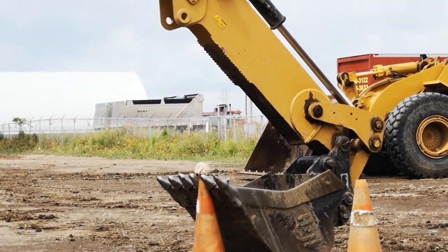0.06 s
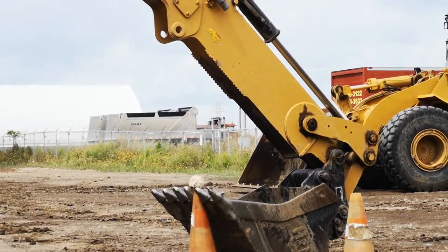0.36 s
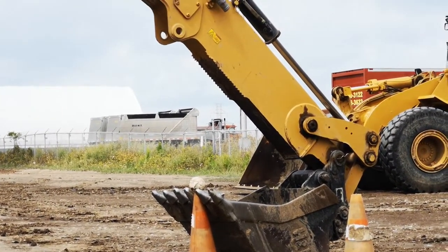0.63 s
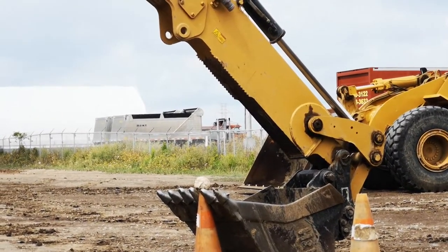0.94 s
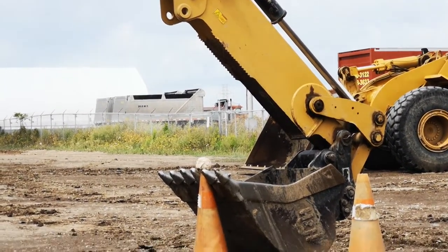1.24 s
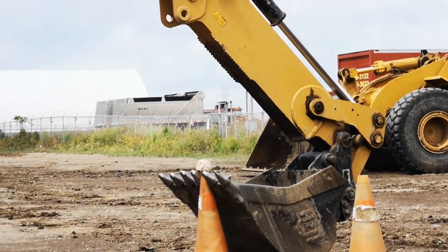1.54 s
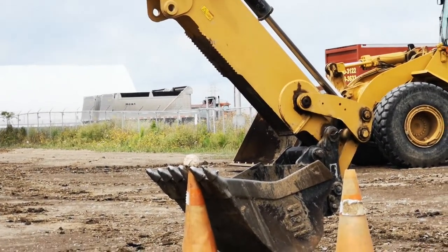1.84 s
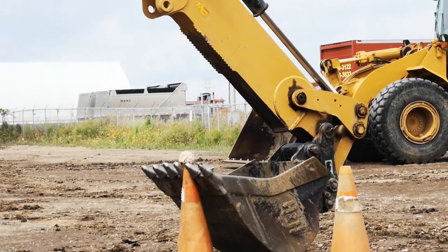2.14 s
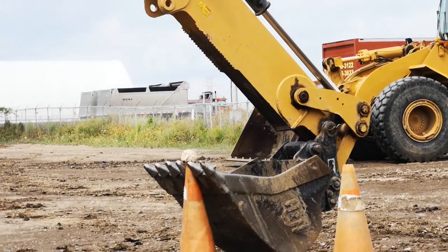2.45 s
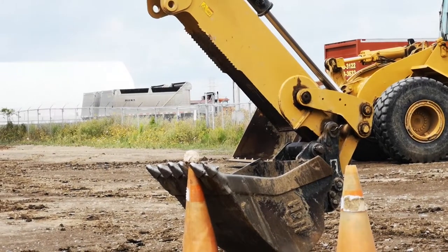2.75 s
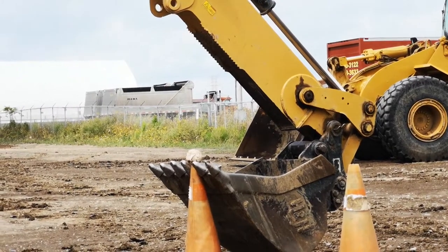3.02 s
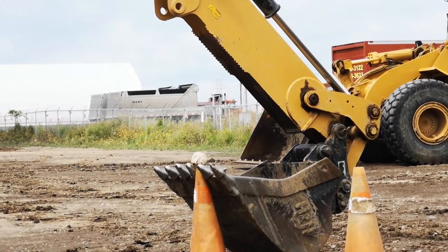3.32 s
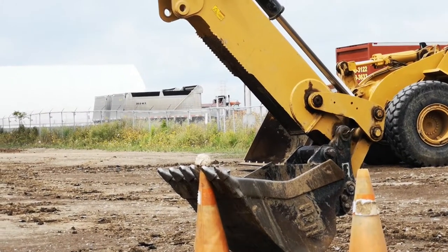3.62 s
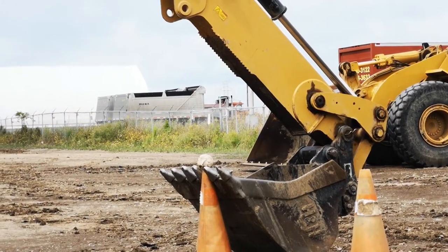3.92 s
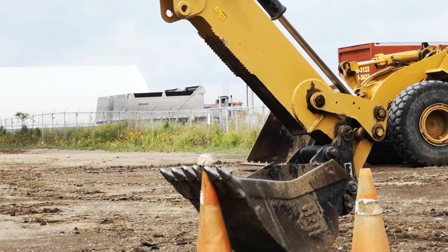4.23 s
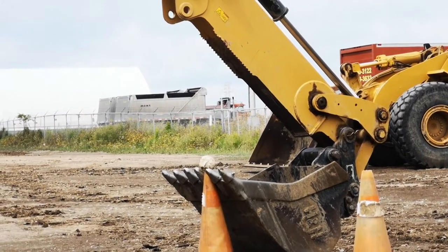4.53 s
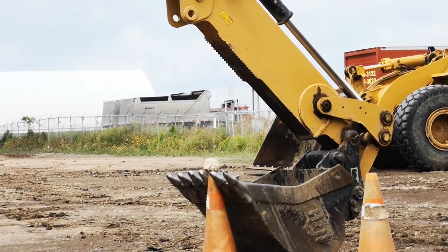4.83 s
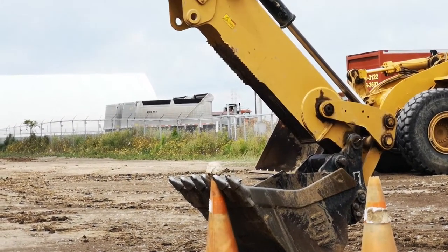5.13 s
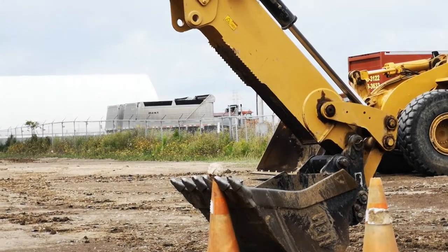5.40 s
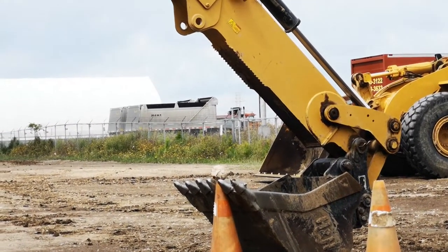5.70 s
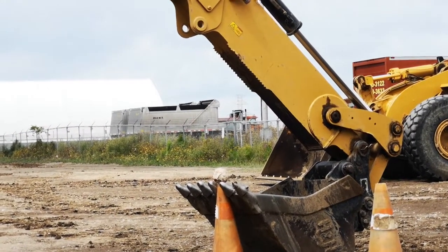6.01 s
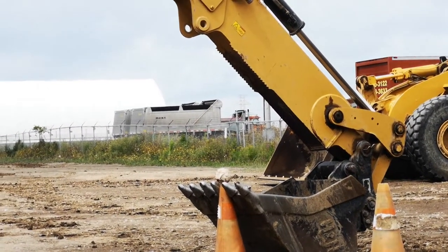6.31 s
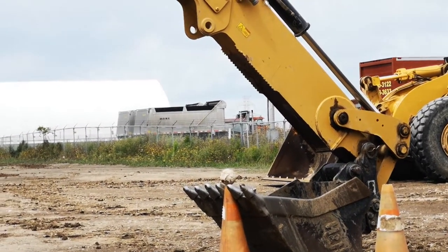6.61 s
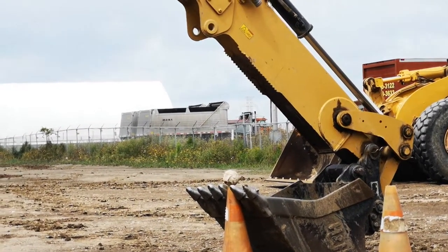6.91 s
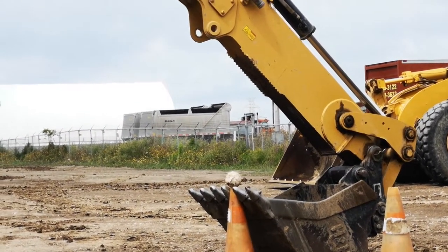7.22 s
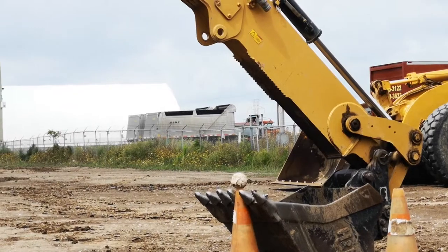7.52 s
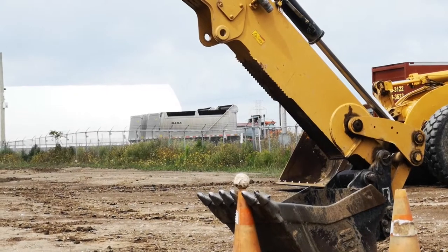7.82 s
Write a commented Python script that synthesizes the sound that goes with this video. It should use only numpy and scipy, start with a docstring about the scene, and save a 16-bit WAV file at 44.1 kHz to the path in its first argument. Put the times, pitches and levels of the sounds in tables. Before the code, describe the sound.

A diesel backhoe idles on an open worksite, its engine clattering and faintly whining a little to the left. Gusts of wind rumble and thump on the microphone throughout, and the hardest ones briefly push the volume down. In the second half the hydraulics are eased on and off: oil hisses through a valve in short spurts, joined by thin whistles and high sliding squeals that are busiest near the end.

```python
"""A diesel backhoe idles on an open worksite, its four-cylinder engine clattering and whining a little
to the left. In the second half the operator eases the hydraulics on and off: oil hisses through a valve
in short spurts, and the valve whistles and squeals when it is barely open. Gusts of wind rumble and
thump on a camera's microphone, and the camera turns everything down under the hardest ones."""
import sys
import numpy as np
from scipy import signal
from scipy.fft import rfft, irfft
from scipy.io import wavfile
from scipy.ndimage import uniform_filter1d

SR = 44100
rng = np.random.default_rng(int(sys.argv[2]) if len(sys.argv) > 2 else 0)


def transcribe(signal):
    """Save signal, clipped to [-1, 1], as a 16-bit WAV file at the path in sys.argv[1]."""
    frames = np.atleast_2d(signal).T
    limited = np.clip(frames, -1, 1)
    pcm = np.round(limited * 32767).astype(np.int16)
    wavfile.write(sys.argv[1], SR, pcm)


N = 355137
TIME = np.arange(N) / SR
FREQ = np.maximum(np.fft.rfftfreq(N, 1 / SR), 1)
CYCLE_HZ = 13.143  # engine cycles a second; all four cylinders fire once in each


def engine(clatter_db=-0.42, waver_db=1.5, speed_wander=0.0016):
    """The idling engine clatters through its housing; its exhaust and gear tones waver in the wind."""
    # The engine's tone colour at the microphone: pitch_hz, left_db, right_db, left_lead_rad, likeness
    colour = [(253.7, -55, -53.5, 0.11, 0.88), (608, -76, -75.5, 2.7, 0.93), (883, -64.5, -77.5, 1.81, 0.7),
              (1247, -76, -75, 2.33, 0.54), (1616, -69.5, -77.5, 3.6, 0.23),
              (2085, -66.5, -79.5, 2.26, 0.73), (2420, -73, -74, 3.83, 0.8), (3100, -81, -83, 5.6, 0.6),
              (4010, -88.5, -87.5, 5.63, 0.8), (5460, -85, -91, 3.6, 0.05), (6580, -90, -94, 7.6, 0.1),
              (7950, -81.5, -90.5, 8.3, 0.4), (10340, -102.0, -101.0, 7, 0.4), (12100, -107, -107, 25, 0)]
    # Ringing panels of the housing: pitch_hz, width_hz, level_db
    panels = [(1182, 32, 3), (1520, 65, -7.5), (1804, 28, 1), (1975, 44, 2), (2102, 30, -4.5),
              (2660, 71, 0), (2875, 74, -10), (3140, 73, -6), (3480, 22, 4.5), (4150, 81, -4),
              (5250, 40, 2)]
    # Exhaust and gear tones: vibrations_per_cycle
    multiples = np.array([4, 8, 12, 16, 55, 59, 60, 71, 75])
    # Strength of each of those tones: level_db
    tone_levels = [-32, -61, -52.5, -40, -56.5, -53.5, -47.5, -49, -50.5]
    cycles = np.cumsum(CYCLE_HZ * (1 + speed_wander * wobble(3))) / SR
    rattle = resonate(stereo(clatter(cycles), clatter(cycles), colour), panels)
    left_db, right_db, lead, _ = over_freq(colour)
    tones = np.zeros((2, N))
    for multiple, level_db in zip(multiples, tone_levels):
        at = np.searchsorted(FREQ, multiple * CYCLE_HZ)
        phase = 2 * np.pi * (multiple * cycles + rng.random())
        strength = np.sqrt(2) * gain(level_db + waver_db * wobble(4.3))
        right = gain(right_db[at] - left_db[at]) * np.sin(phase - lead[at])
        tones += strength * np.array([np.sin(phase), right])
    return gain(clatter_db) * rattle + tones


def clatter(cycles, repeat_share=0.072, knock=0.11, decay_firings=0.81, scatter_db=7.5):
    """Engine valves and injectors rattle partly alike each cycle; every firing adds its own knock."""
    cycle_samples = int(SR / CYCLE_HZ)
    pattern = rng.standard_normal(cycle_samples)[(cycles % 1 * cycle_samples).astype(int)]
    firings = cycles * 4
    cylinder_db = np.take([1.1, 0.72, 0.39, 0.3], firings.astype(int), mode="wrap")
    strength = gain(cylinder_db + scatter_db * noise()[firings.astype(int)])
    blows = 1 + knock * strength * np.exp(-(firings % 1) / decay_firings)
    rattle = np.sqrt(repeat_share) * pattern + np.sqrt(1 - repeat_share) * noise()
    return normalize(rattle * blows)


def drift_treble(sound, above_hz=2200):
    """The engine's treble slowly swells and sinks."""
    # Rise and fall of the treble: time_s, change_db
    drift = [(0, -1.5), (.65, 0), (1.3, 1), (2.15, 0.8), (2.6, 0.5), (3.0, 1), (3.6, -0.4), (4.4, 1.5),
             (5.5, 0.5), (8.05, -0.5)]
    treble = irfft(rfft(sound) / (1 + (above_hz / FREQ) ** 4), N)
    return sound + treble * (gain(np.interp(TIME, *np.transpose(drift))) - 1)


def hydraulics():
    """The valve hisses, whistles and squeals; a few weakened bands make it sound hollow."""
    # Weakened bands: pitch_hz, width_hz, change_db
    gaps = [(1470, 180, -3), (2440, 200, -2.5), (3730, 500, -3.5), (4360, 260, -6), (6200, 300, -4.5),
            (8700, 330, -2), (9750, 350, -4), (10900, 760, -12)]
    valve = oil_jet() + valve_whistles() + valve_squeals()
    dips = [1 - (1 - gain(db)) / (1 + 2j * (FREQ - hz) / width) for hz, width, db in gaps]
    return irfft(rfft(valve) * np.prod(dips, axis=0), N)


def oil_jet(split_hz=3700, hiss_boost_db=2.0, ring_boost_db=1.5, sputter_db=0.8):
    """Bubbles collapse in the rushing oil: a hiss and a hollow note, pitched by how far the valve opens."""
    # The jet's tone colour at the microphone: pitch_hz, left_db, right_db, left_lead_rad, likeness
    colour = [(497, -35, -47, 8, 0.38), (1220, -5, -8.5, 9, 0.16), (1390, -6, -9.5, 4.5, 0.18),
              (1950, -5.5, -10.5, -1.5, 0.91), (2370, -0.5, -9.5, -1, 0.18), (2520, -12, -1.5, -1, 0.073),
              (3540, -27, -14, -3, 0.21), (4320, -20.5, -21, -10, 0.21), (4740, -17.5, -18, -3.5, 0.35),
              (5650, -11.5, -16.5, -11.5, 0.51), (6540, -25.5, -19.5, -3.5, 1),
              (7970, -14.5, -25, -7.5, 0.42), (9600, -26, -16, -8.5, 1), (10400, -21, -34, -16, 0.15),
              (12300, -31.5, -31, -9, 0.28), (14800, -42, -41, -16, 0.23)]
    # Ringing notes of the oil lines: pitch_hz, width_hz, level_db
    pipe_notes = [(1195, 40, 8), (1806, 20, 14), (1952, 25, 15.5), (2097, 58, 5.5), (2795, 37, 7.5),
                  (4120, 180, 3.5), (5500, 200, -3), (6620, 110, 3), (7270, 80, -8), (7700, 120, -3),
                  (7910, 89, 4.5), (8220, 110, -1), (9330, 220, -1.5)]
    # Valve openings: start_s, length_s, hiss_db, ring_db, note_hz, hiss_hz
    spurts = [(4.644, 0.012, -40, -39, 1880, 8200), (4.692, 0.031, -32.5, -28, 1880, 8260),
              (4.740, 0.029, -30, -31, 1890, 7850), (4.793, 0.028, -30.5, -28, 2010, 7700),
              (4.848, 0.024, -32.5, -29, 1930, 7540), (5.711, 0.014, -32.5, -32, 1950, 8800),
              (5.746, 0.032, -27, -32.5, 2100, 8100), (5.781, 0.048, -34, -32, 2100, 8700),
              (6.581, 0.017, -32, -32, 1880, 8600), (6.602, 0.031, -27, -45, 1900, 8500),
              (6.664, 0.012, -25.5, -43, 1900, 9050), (6.685, 0.049, -33.5, -31.5, 1790, 8700),
              (7.281, 0.014, -32.5, -32, 1970, 7950), (7.314, 0.042, -27, -32.5, 2160, 7850),
              (7.39, 0.027, -23.5, -36.5, 2280, 8000), (7.439, 0.026, -30, -36, 2390, 7750),
              (7.471, 0.054, -27.5, -30, 2360, 8000), (7.67, 0.018, -27, -31, 1890, 7940),
              (7.709, 0.041, -28.5, -29.5, 1650, 8000), (7.769, 0.017, -27.5, -28.5, 1920, 8200),
              (8.02, .041, -29.5, -29.5, 1860, 8100)]
    jet = rfft(resonate(stereo(noise(), noise(), colour), pipe_notes))
    low_share = 1 / (1 + (FREQ / split_hz) ** 8)
    high, low = irfft(jet * (1 - low_share), N), irfft(jet * low_share, N)
    out = np.zeros((2, N))
    for start, length, hiss_db, ring_db, note_hz, hiss_hz in spurts:
        near = slice(int((start - 0.1) * SR), int((start + 0.3) * SR))
        hiss = stress_band(high[:, near], hiss_hz, width_hz=600)
        ring = stress_band(low[:, near], note_hz, width_hz=260)
        out[:, near] += gain(hiss_db + hiss_boost_db) * fade(start, length, fall_s=0.0079)[near] * hiss
        out[:, near] += gain(ring_db + ring_boost_db) * fade(start, length, fall_s=0.02)[near] * ring
    return out * gain(sputter_db * wobble(150))


def valve_whistles(shake_db=2):
    """The nearly closed valve sings short, fluttering notes."""
    # Whistles: start_s, length_s, pitch_hz, level_db, flutter_share (of the pitch)
    notes = [(4.748, 0.011, 2775, -22, 0.012), (5.58, .016, 5710, -39, 0.0033),
             (5.615, 0.01, 5640, -32.5, 0.0035), (5.732, 0.036, 6630, -32.5, 0.012),
             (6.511, 0.028, 5660, -37.5, 0.0033), (6.738, 0.033, 5630, -47, .003),
             (7.228, 0.013, 5620, -34.5, .003), (7.324, 0.019, 1960, -17, 0.029),
             (7.328, 0.031, 2620, -29, 0.011), (7.408, .012, 8100, -23, .014),
             (7.413, 0.0094, 7740, -17.5, .005), (7.439, 0.028, 2570, -30, 0.028),
             (7.457, .015, 7340, -28, .006), (7.505, .008, 5700, -26, 0.0067),
             (7.545, 0.033, 5620, -39.5, 0.006)]
    out, flutter = np.zeros((2, N)), wobble(700)
    for start, length, pitch_hz, level_db, flutter_share in notes:
        near = (TIME > start) & (TIME < start + length + 0.04)
        loudness = gain(level_db) * fade(start, length, rise_s=0.005, fall_s=0.0047)[near]
        out[:, near] += loudness * valve_tone(pitch_hz * (1 + flutter_share * flutter[near]))
    return out * gain(shake_db * wobble(200))


def valve_squeals(trim_db=-5.5, shake_db=3, rasp=0.37, spray_db=-16, usual_flutter=0.053):
    """Barely open, the valve rings with a sliding screech; the rougher it is, the more it sprays."""
    # One list of points for each squeal: time_s, pitch_hz, level_db, flutter_share (of the pitch)
    curves = [
        [(5.724, 4860, -44, .04), (5.732, 5260, -24, 0.04), (5.741, 6060, -22, .06), (5.747, 6000, -31, 0.05),
         (5.757, 5740, -20, 0.03), (5.766, 5500, -24, 0.039), (5.785, 5300, -38, 0.055)],
        [(6.584, 5650, -44, 0.047), (6.594, 5380, -20, 0.029), (6.621, 5600, -24, .04),
         (6.630, 5050, -29.5, 0.049), (6.641, 4550, -27, 0.041), (6.653, 4700, -26.5, 0.056),
         (6.658, 5510, -20, 0.025), (6.667, 5540, -21.5, 0.02), (6.675, 5250, -26, 0.075),
         (6.69, 4560, -29, 0.093)],
        [(7.286, 5000, -36, 0.025), (7.304, 5000, -27, .02), (7.311, 5570, -18.5, 0.012),
         (7.32, 5450, -31, 0.035), (7.35, 4970, -34, 0.016), (7.368, 5010, -26, 0.021),
         (7.375, 5600, -16, 0.013), (7.39, 5650, -19, 0.0087), (7.406, 5600, -48, 0.034),
         (7.424, 4900, -28, 0.015), (7.441, 4975, -24.5, 0.0085), (7.47, 5000, -40, 0.015)],
    ]
    # Ringing notes of the valve body: pitch_hz, width_hz, level_db
    body_notes = [(4990, 19, 9), (5460, 36, -1), (5657, 56, 8.5), (6560, 50, 1), (9980, 66, 6),
                  (10800, 160, 15)]
    # Tone colour of the fine spray: pitch_hz, level_db
    spray_colour = [(6000, -21), (9300, 2), (11500, -3), (13300, -3), (15000, -7)]
    out, flutter = np.zeros((2, N)), wobble(900)
    spray = gain(spray_db) * np.array([coloured_noise(spray_colour), coloured_noise(spray_colour)])
    for curve in curves:
        times, *columns = np.transpose(curve)
        near = (TIME > times[0]) & (TIME < times[-1])
        pitch_hz, level_db, flutter_share = (np.interp(TIME[near], times, c) for c in columns)
        tone = valve_tone(pitch_hz * (1 + flutter_share * flutter[near]))
        out[:, near] += gain(level_db + trim_db) * (tone + flutter_share / usual_flutter * spray[:, near])
    rasping = out * gain(shake_db * wobble(410)) * (1 + rasp * wobble(1400))
    return resonate(rasping, body_notes)


def valve_tone(pitch_hz, octave_db=1, ring_hz=9300, width_hz=1200, right_db=-5, lead_rad=-0.86):
    """The valve's tone in stereo; the octave above it flares up as it nears a high ringing note."""
    phase = 2 * np.pi * np.cumsum(pitch_hz) / SR - np.array([[0], [lead_rad]])
    octave = gain(octave_db) / (1 + (2 * (2 * pitch_hz - ring_hz) / width_hz) ** 2)
    return np.sqrt(2) * (gain([[0], [right_db]]) * np.sin(phase) + octave * np.sin(2 * phase))


def wind(unrest_db=2, lump_db=1.5, rasp_db=-45, rasp_growth=2.19, patchy_db=4,
         lag_s=0.0008, dull_hz=380, right_db=-1.1):
    """Air swirls over the microphone: it rumbles in lumps, flutters, and rasps when it is fastest."""
    # Tone colour of slow swirls: pitch_hz, level_db
    rumble_colour = [(8, 5.5), (22, 9), (45, 7), (100, 9.5), (150, 0.5), (220, -8.5), (400, -70)]
    # Tone colour of quick swirls: pitch_hz, level_db
    flutter_colour = [(80, -46), (150, 0), (210, -2), (310, -6), (430, -9.5), (600, -38), (1200, -92)]
    # Tone colour of the fastest air: pitch_hz, level_db
    rasp_colour = [(200, -26.5), (400, 8.5), (650, 7), (1000, -27.5), (1800, -16), (4000, -59), (9000, -94)]
    slow_db, quick_db = (db + unrest_db * np.tanh(wobble(9)) for db in wind_strength())
    thumps, crackle = air_slaps(quick_db)
    rumble = gain(slow_db) * swirls(rumble_colour, even_samples=3000, skew=0.16)
    rumble *= gain(lump_db * np.tanh(wobble(28)))
    flutter = gain(quick_db) * swirls(flutter_colour, even_samples=1800, skew=0.12)
    patches = normalize(gain(patchy_db * np.tanh(wobble(92))))
    rasp_strength = gain(rasp_db + rasp_growth * (quick_db + 27.5)) * patches
    rasp = (rasp_strength + crackle) * swirls(rasp_colour, even_samples=300, skew=0.084, clump_db=11.5)
    left = thumps + rumble + flutter + rasp
    # The right side gets the same air later and duller, plus faint swirls of its own.
    right = irfft(rfft(left) * np.exp(-2j * np.pi * FREQ * lag_s) / np.hypot(1, FREQ / dull_hz), N)
    own_flutter = gain(quick_db - 10) * coloured_noise(flutter_colour)
    own_rumble = gain(slow_db - 16) * coloured_noise(rumble_colour)
    return np.array([left, gain(right_db) * right + own_flutter + own_rumble])


def wind_strength(steepness=3.07):
    """Gusts swell and fade on top of a breeze; gives the levels in dB of slow and quick swirls."""
    # The breeze between gusts: time_s, rumble_db, flutter_db
    breeze = [(0, -20, -39.5), (1.08, -14.5, -20), (1.28, -27, -40.5), (1.6, -24.5, -42),
              (1.85, -22.5, -35.5), (2.45, -26.5, -34), (3.05, -31, -36.5), (3.55, -21.5, -35.5),
              (4.05, -23, -36.5), (4.6, -33, -32.5), (4.85, -34, -38.5), (5.5, -22.5, -33),
              (6.15, -25.5, -23), (6.58, -27.5, -49), (7.3, -18, -28.5), (7.85, -30, -35),
              (8.05, -21.5, -30.5)]
    # Gusts on the microphone: middle_s, length_s, rumble_db, flutter_db
    gusts = [(0.033, 0.044, -10.5, -15.5), (0.121, 0.084, -12, -20.5), (0.493, 0.14, -12.5, -17),
             (0.673, 0.044, -27, -15.5), (0.791, 0.02, -12.5, -22), (0.975, 0.079, -11, -17.5),
             (1.174, 0.059, -20.5, -21), (1.394, 0.07, -15.5, -33.5), (1.484, 0.039, -15.5, -29.5),
             (1.665, 0.023, -17, -36), (1.781, 0.056, -17.5, -33), (1.863, 0.029, -18, -21.5),
             (2.053, 0.041, -28, -21.5), (2.265, 0.07, -12, -19), (2.743, 0.15, -15, -24.5),
             (3.233, 0.13, -15.5, -23), (3.341, 0.1, -14.5, -19), (3.432, 0.11, -39, -21.5),
             (3.699, 0.024, -16.5, -20), (3.971, 0.06, -18, -36), (4.273, 0.11, -13, -17),
             (4.394, 0.085, -10, -18), (5.126, 0.018, -11.5, -23.5), (5.317, 0.043, -13.5, -27),
             (5.396, 0.063, -18.5, -26), (6.391, 0.17, -13, -20), (6.787, 0.094, -19, -22),
             (6.865, 0.068, -16.5, -42), (7.091, 0.033, -18.5, -15.5), (7.462, 0.15, -12, -18),
             (7.597, 0.027, -6.5, -20.5)]
    times, *columns = np.transpose(breeze)
    power = gain([np.interp(TIME, times, c) for c in columns]) ** 2
    for middle, length, rumble_db, flutter_db in gusts:
        near = np.abs(TIME - middle) < 2 * length
        swell = 0.5 ** (np.abs(2 * (TIME[near] - middle) / length) ** steepness)
        power[:, near] += gain([[rumble_db], [flutter_db]]) ** 2 * swell
    return 10 * np.log10(power)


def swirls(colour, even_samples, skew, clump_db=0):
    """Churning air, evened out and then clumped by clump_db; skew makes peaks sharper than troughs."""
    air = coloured_noise(colour)
    air /= np.sqrt(uniform_filter1d(air ** 2, even_samples) + 1e-6)
    clumps = gain(clump_db * np.tanh(wobble(246)))
    return normalize((air + skew * (air ** 2 - 1)) * clumps)


def air_slaps(quick_db, thump_trim_db=-2, snap_boost_db=11, snap_share=0.26, crackle_s=0.004):
    """Single swirls hit with a thump and a snap; gives that sound and the strength of their crackle."""
    # The hardest slaps: time_s, thump_db, half_width_s, crackle_db
    hard_slaps = [(0.0206, -5, 0.0039, -19), (0.0381, 9, 0.00082, -3.5), (0.1274, -5, 0.00092, -30),
                  (0.1494, -3.5, 0.0017, -15.5), (0.253, -5, 0.0029, -36), (0.2765, -7.5, 0.0019, -40.5),
                  (0.3078, -3.5, 0.0025, -22), (0.413, -6, 0.0029, -45), (0.475, -8, 0.00084, -20),
                  (0.4957, 2.5, 0.0017, -17), (0.532, 0, 0.0016, -12), (0.6302, -0.5, 0.0019, -22),
                  (0.6601, -18, 0.0018, -13), (0.6687, 3, 0.0016, -8.5), (0.689, -5, 0.0016, -17),
                  (0.699, -8, 0.0012, -17), (0.793, -14, 0.0014, -29), (0.8397, -5, 0.0013, -42),
                  (0.951, 1, 0.002, -10.5), (0.965, 10, 0.0019, -27), (0.976, 1, 0.003, -14.5),
                  (0.9969, 1, 0.0015, -15.5), (1.1725, -3.5, 0.0043, -20.5), (1.472, -4, 0.0041, -32),
                  (1.757, -13, 0.0027, -23.5), (1.786, -13, 0.0046, -44), (2.243, -2, 0.0076, -37),
                  (2.2763, 3, 0.0032, -7), (2.2824, -5, 0.0016, -14), (2.525, -13.5, 0.0021, -25.5),
                  (3.247, -1.5, 0.0011, -40), (3.3261, -2, 0.00091, -41), (3.3467, -3, 0.002, -40),
                  (3.3748, -2, 0.0026, -36), (3.485, -8, 0.0014, -24.5), (3.694, -13, 0.00084, -36),
                  (4.213, -1.5, .0013, -24), (4.245, 1.5, 0.0017, -9.5), (4.2943, 0, 0.0014, -37),
                  (4.3209, -2, 0.00097, -33), (4.372, -2.5, 0.001, -30), (4.3901, -2, 0.0019, -19),
                  (4.4007, 0.5, 0.00088, -33), (5.0928, -6.5, 0.00078, -32), (5.116, -8, .0014, -37),
                  (5.3214, -5.5, 0.0015, -36), (5.417, -5.5, 0.002, -37), (6.157, -5, .0007, -34),
                  (6.296, -9, 0.00095, -26), (6.3514, -7, 0.0017, -37), (6.3799, -3, 0.0012, -27),
                  (6.399, -2.5, 0.0016, -33), (6.436, 1.5, 0.002, -34), (6.8468, -4, 0.0015, -37),
                  (6.871, -4.5, 0.0015, -33), (7.074, -3.5, 0.0055, -33), (7.0884, -8.5, 0.0011, -20),
                  (7.2559, -2, 0.00081, -46), (7.3674, 1.5, 0.0015, -14), (7.3956, -5, 0.00062, -19.5),
                  (7.4105, -2, 0.0024, -16), (7.4581, -7, 0.0022, -13), (7.4794, 1, 0.00256, -10),
                  (7.505, -8, 0.0013, -12.5), (7.5256, -3.5, 0.0016, -12.5), (7.5989, -1, 0.0023, -30)]
    thumps, crackle = np.zeros(N), np.zeros(N)
    for time_s, thump_db, half_width_s, crackle_db in [*hard_slaps, *soft_slaps(quick_db)]:
        near = np.abs(TIME - time_s) < 0.04
        age, snap_s = TIME[near] - time_s, snap_share * half_width_s
        spread = (age / half_width_s) ** 2
        thumps[near] += gain(thump_db + thump_trim_db) * (1 - spread) * np.exp(-spread / 2)
        thumps[near] -= gain(crackle_db + snap_boost_db) * age / snap_s * np.exp(-(age / snap_s) ** 2)
        onset = np.interp(age, [-crackle_s / 2, 0], [0, 1])
        crackle[near] += gain(crackle_db) * np.exp(-np.abs(age) / crackle_s) * onset
    return thumps, crackle


def soft_slaps(quick_db, count=70, above_db=8, scatter_db=3, half_width_s=0.0012, crackle_below_db=27):
    """Smaller swirls hit at random, harder in quicker air; gives rows like those of hard_slaps."""
    when, force, size = rng.random((count, 3)).T
    times = when * TIME[-1]
    thump_db = np.interp(times, TIME, quick_db) + above_db + scatter_db * (2 * force - 1)
    return np.column_stack([times, thump_db, half_width_s * 2 ** (size - 0.5), thump_db - crackle_below_db])


def worksite_echo(sound, echo_db=-17, die_away_s=0.41):
    """The digging arm, bucket and ground throw back a short, faint echo."""
    age = TIME[:SR // 2]
    tail = rng.standard_normal((2, len(age))) * gain(-60 * age / die_away_s) * (age > 0.004)
    tail /= np.sqrt(np.sum(tail ** 2, axis=1, keepdims=True))
    return sound + gain(echo_db) * signal.fftconvolve(sound, tail, axes=1)[:, :N]


def stereo(direct, scattered, colour):
    """The right side hears the left's sound shifted in time, mixed with scatter off ground and machine."""
    left_db, right_db, lead, likeness = over_freq(colour)
    left = rfft(direct)
    right = likeness * left * np.exp(-1j * lead) + np.sqrt(1 - likeness ** 2) * rfft(scattered)
    return irfft(np.array([left * gain(left_db), right * gain(right_db)]), N) * np.sqrt(SR / 2)


def auto_volume(sound, threshold_db=-14.5, cut_share=0.5, recover_db_per_s=34, sense_s=0.0037):
    """The camera turns loud sound down quickly and lets the volume creep back."""
    memory = np.exp(-1 / (sense_s * SR))
    power = signal.lfilter([1 - memory], [1, -memory], np.mean(sound ** 2, axis=0))
    cut_db = cut_share * np.maximum(10 * np.log10(power + 1e-12) - threshold_db, 0)
    creep_db = recover_db_per_s * TIME
    return sound * gain(creep_db - np.maximum.accumulate(cut_db + creep_db))


def resonate(sound, notes):
    """Add an object's ringing notes to a sound."""
    ring = 1 + sum(gain(db) / (1 + 2j * (FREQ - hz) / width) for hz, width, db in notes)
    return irfft(rfft(sound) * ring, N)


def stress_band(sound, pitch_hz, width_hz, added_db=3):
    """Make one band stand out, then normalize."""
    band = signal.lfilter(*signal.iirpeak(pitch_hz, pitch_hz / width_hz, fs=SR), sound)
    return normalize(sound + gain(added_db) * band)


def fade(start_s, length_s, fall_s, rise_s=0.002):
    """A loudness curve that rises, holds, then dies away."""
    age = np.maximum(TIME - start_s, 0)
    return (1 - np.exp(-age / rise_s)) * np.exp(-np.clip((age - length_s) / fall_s, 0, 20))


def wobble(rate_hz):
    """A smooth random curve of typical size 1 that changes about rate_hz times a second."""
    return normalize(irfft(rfft(noise()) * np.exp(-(FREQ / rate_hz) ** 2), N))


def coloured_noise(colour):
    """Normalized noise with the given tone colour."""
    return normalize(irfft(rfft(noise()) * gain(over_freq(colour)[0]), N))


def over_freq(table):
    """Turn the columns after pitch_hz into curves over all frequencies."""
    pitch_hz, *columns = np.transpose(table)
    return [np.interp(np.log(FREQ), np.log(pitch_hz), c) for c in columns]


def noise():
    """Fresh white noise."""
    return rng.standard_normal(N)


def normalize(sound):
    """Scale to an average power of 1."""
    return sound / np.sqrt(np.mean(sound ** 2))


def gain(db):
    """Turn decibels into a multiplier."""
    return 10 ** (np.asarray(db) / 20)


def scene():
    """The idling engine, the hydraulics with their echo, and the wind."""
    valve = hydraulics()
    return drift_treble(engine()) + worksite_echo(valve) + wind()


def record(dry, top_hz=15200):
    """The camera turns down under the gusts, rounds off the hardest slaps and cuts the highest treble."""
    held = auto_volume(dry)
    rounded = held / (1 + held ** 4) ** (1 / 4)
    return signal.sosfilt(signal.ellip(8, 0.2, 70, top_hz, fs=SR, output="sos"), rounded)


dry = scene()
out = record(dry)
transcribe(out)
```